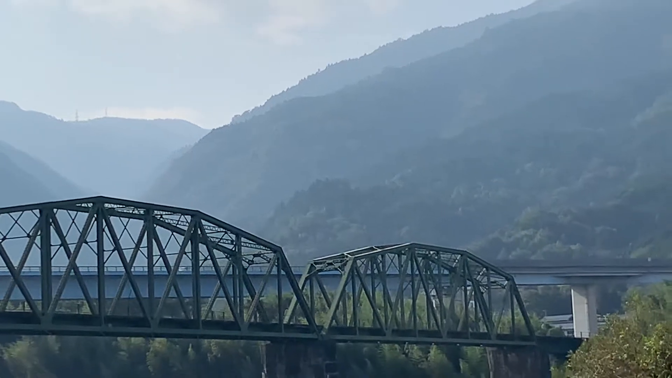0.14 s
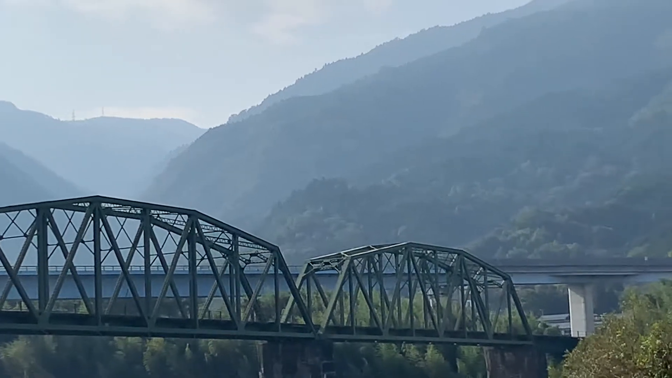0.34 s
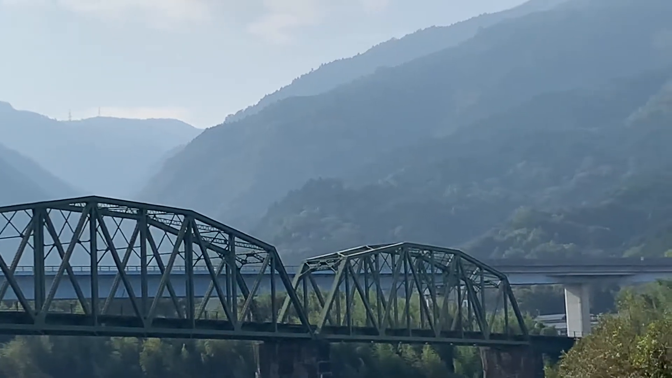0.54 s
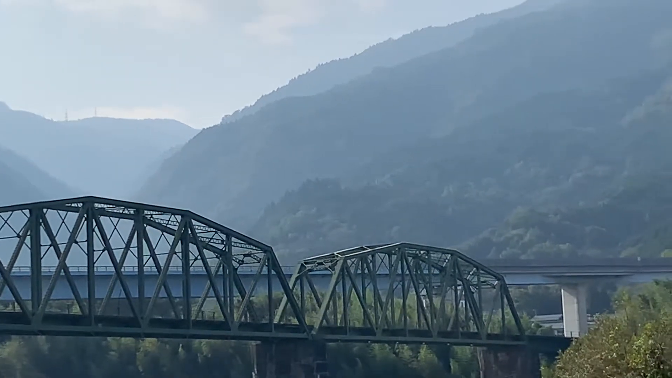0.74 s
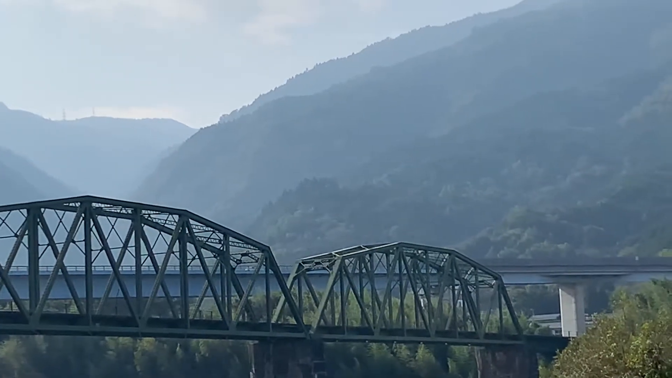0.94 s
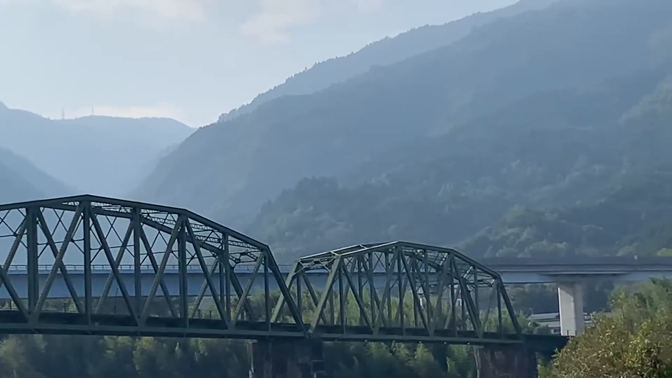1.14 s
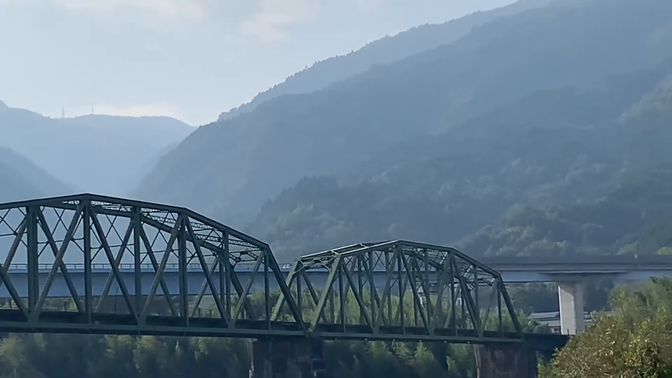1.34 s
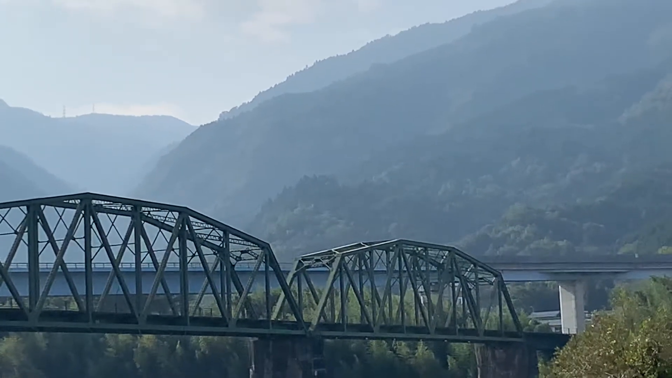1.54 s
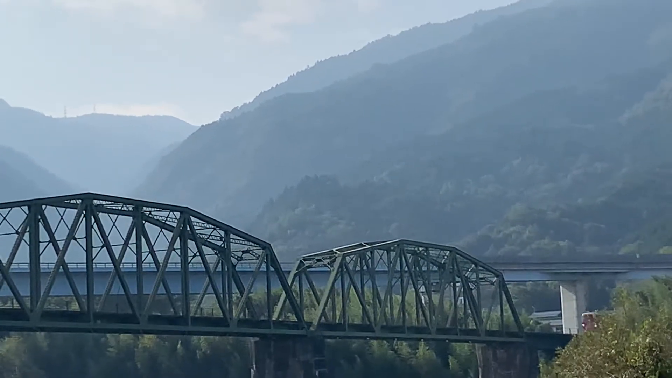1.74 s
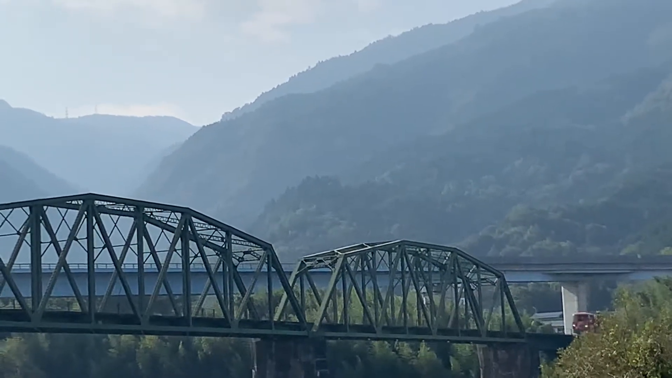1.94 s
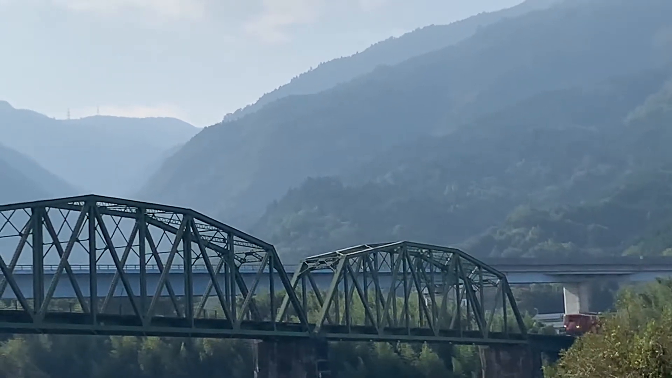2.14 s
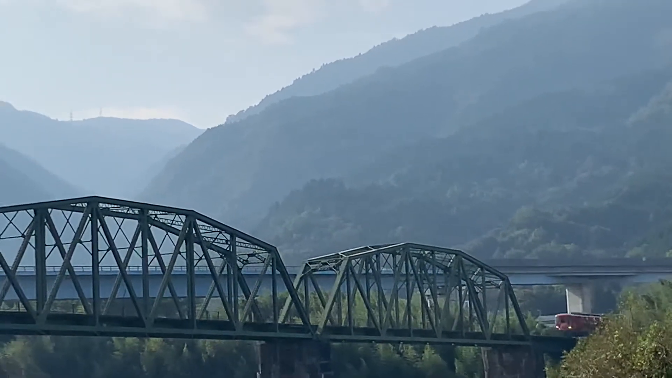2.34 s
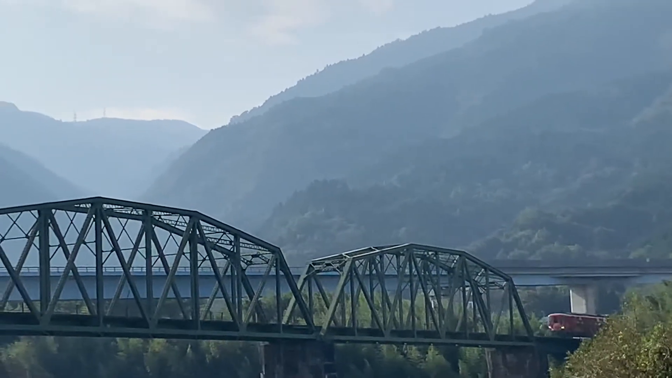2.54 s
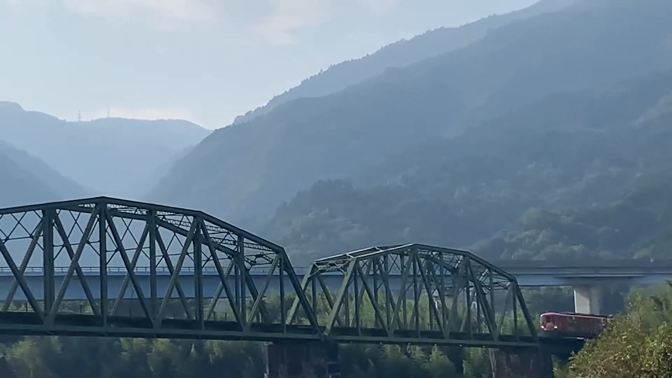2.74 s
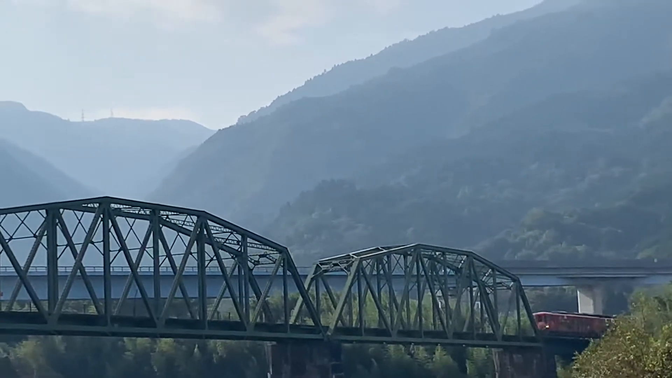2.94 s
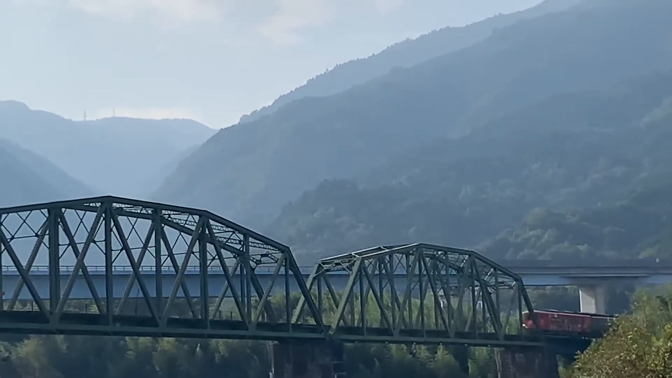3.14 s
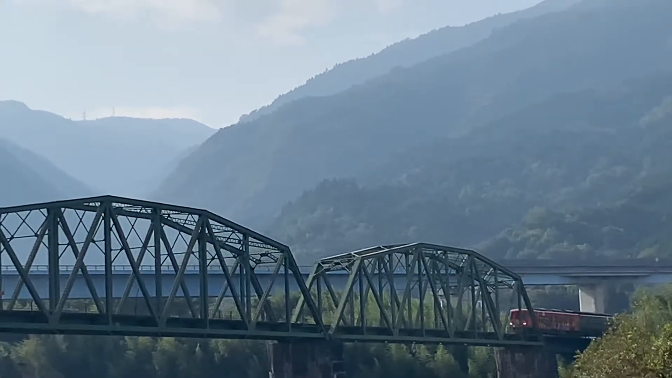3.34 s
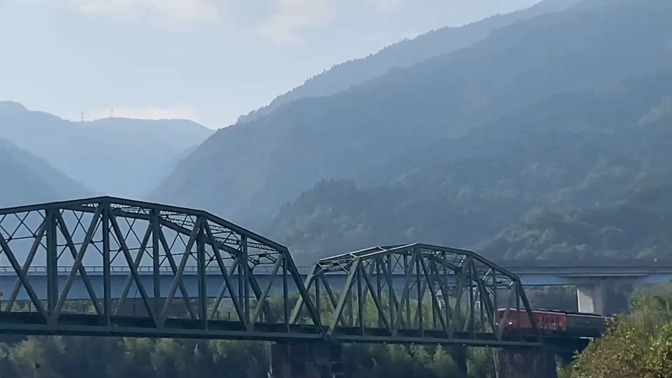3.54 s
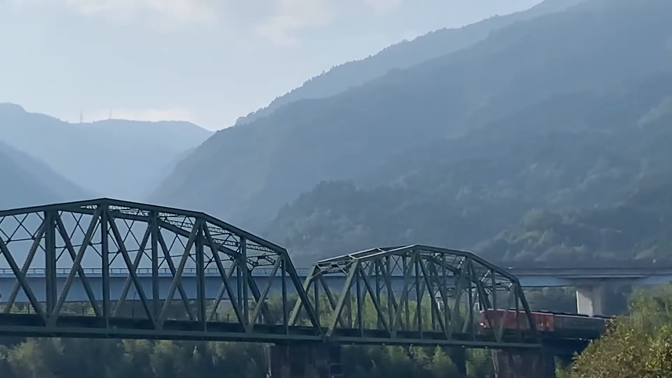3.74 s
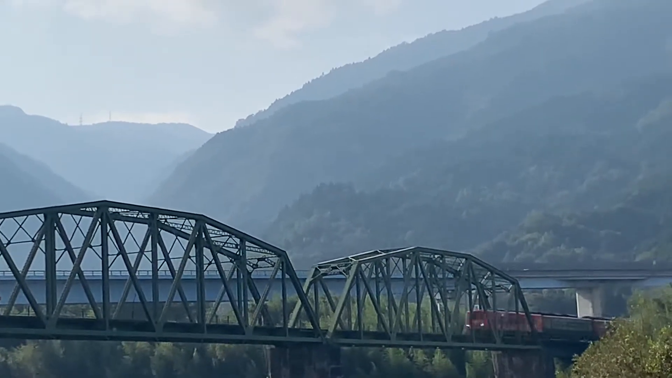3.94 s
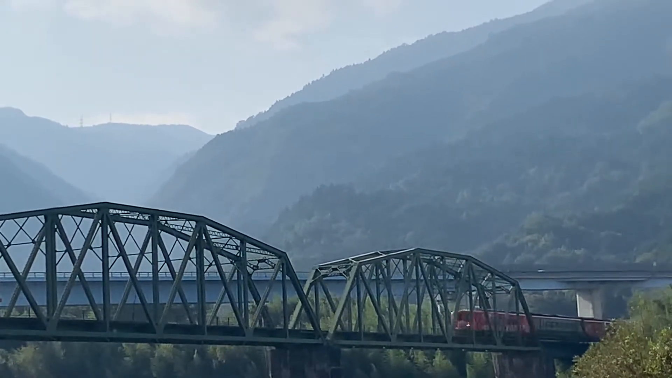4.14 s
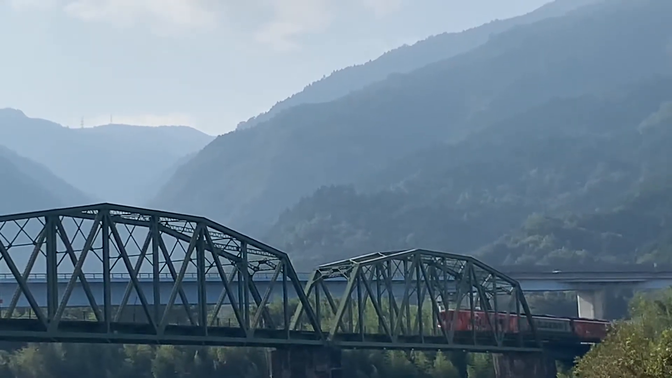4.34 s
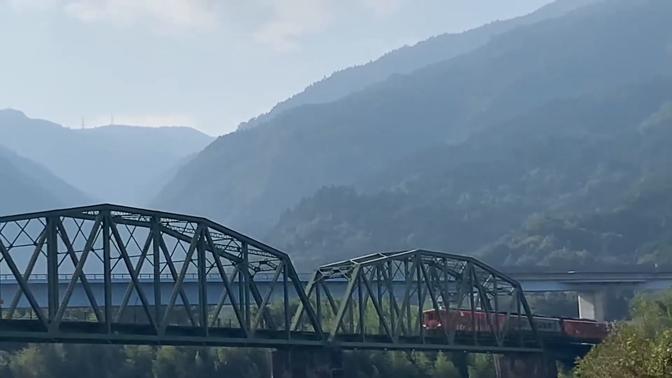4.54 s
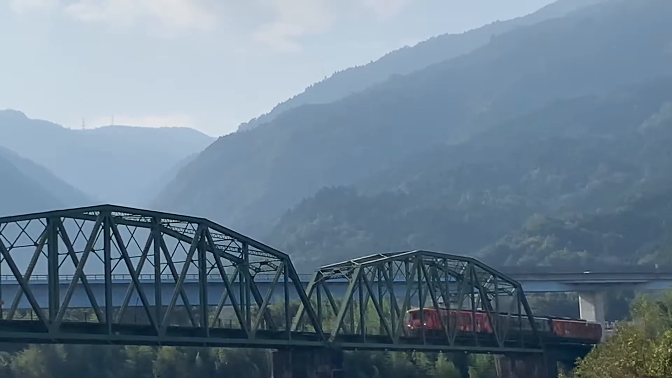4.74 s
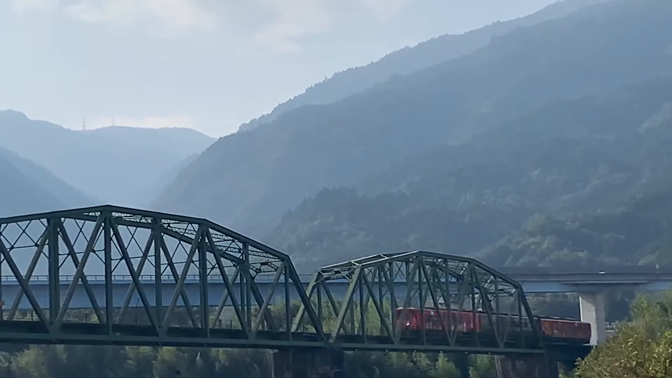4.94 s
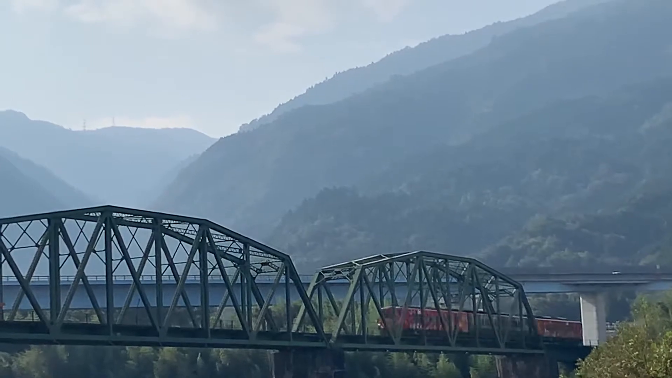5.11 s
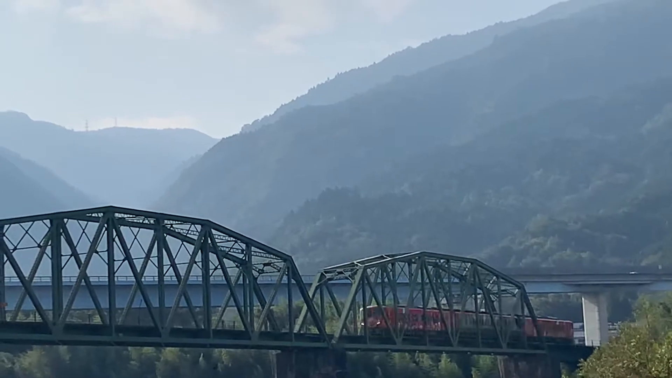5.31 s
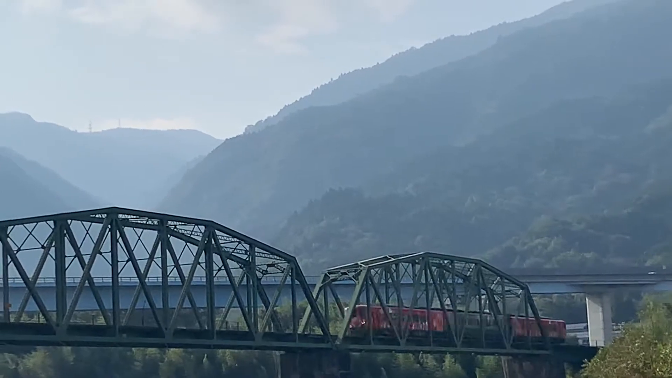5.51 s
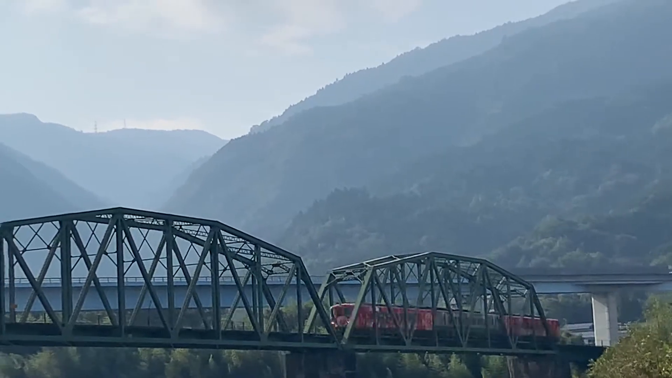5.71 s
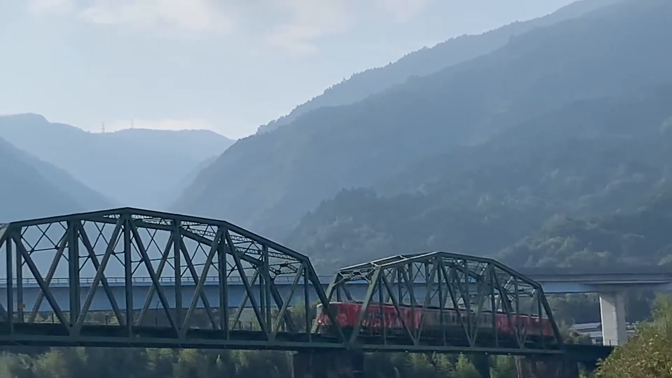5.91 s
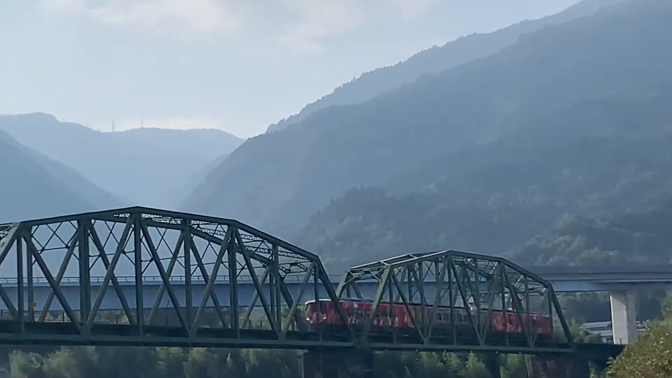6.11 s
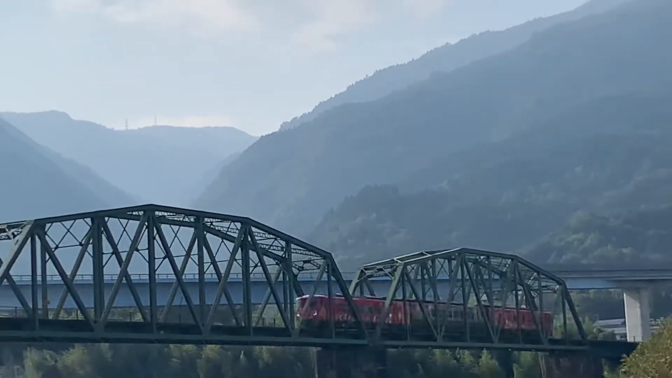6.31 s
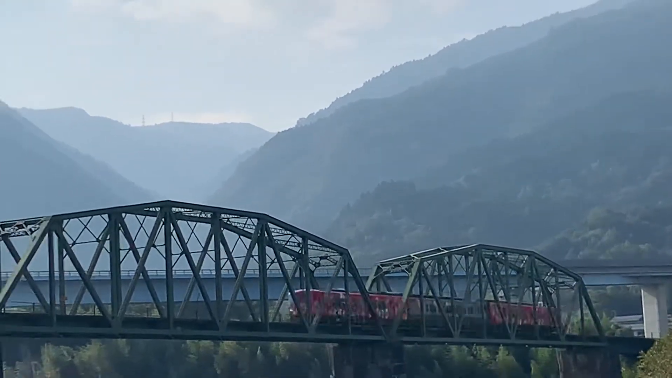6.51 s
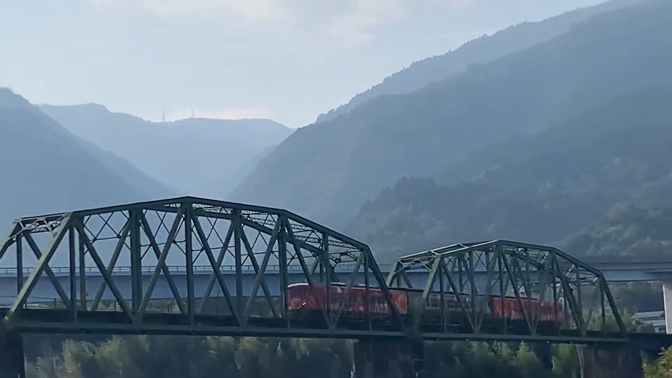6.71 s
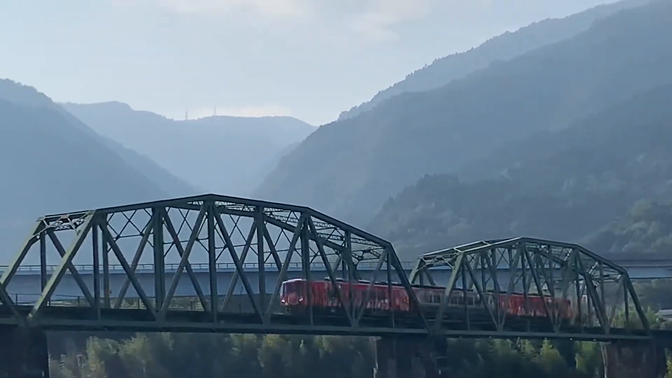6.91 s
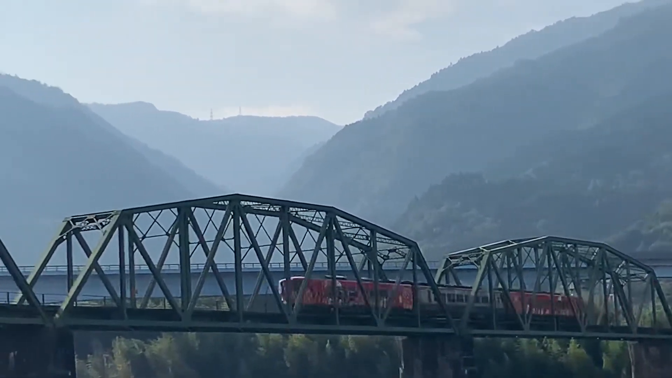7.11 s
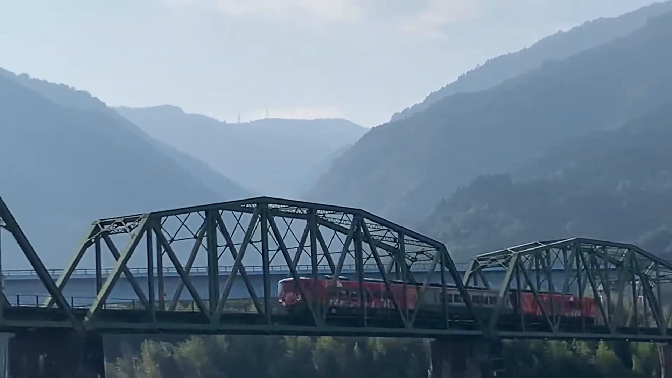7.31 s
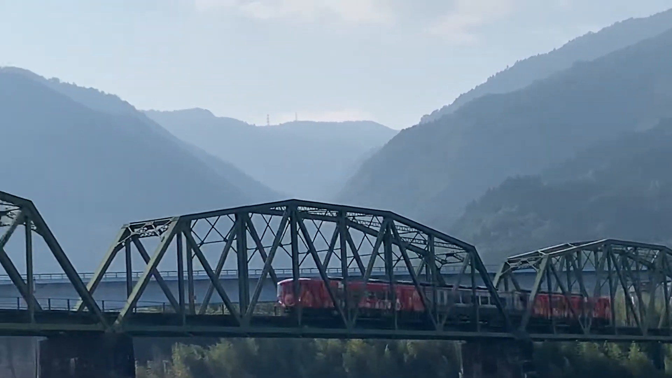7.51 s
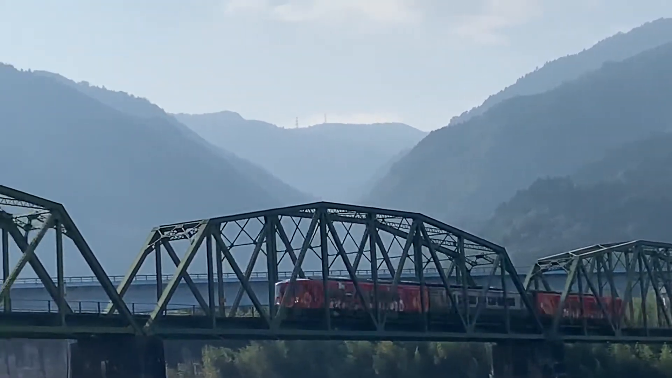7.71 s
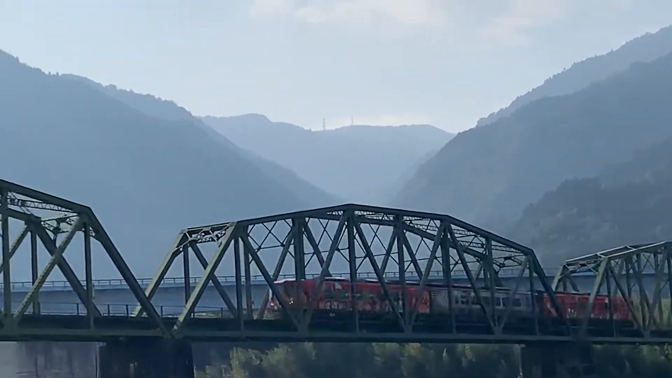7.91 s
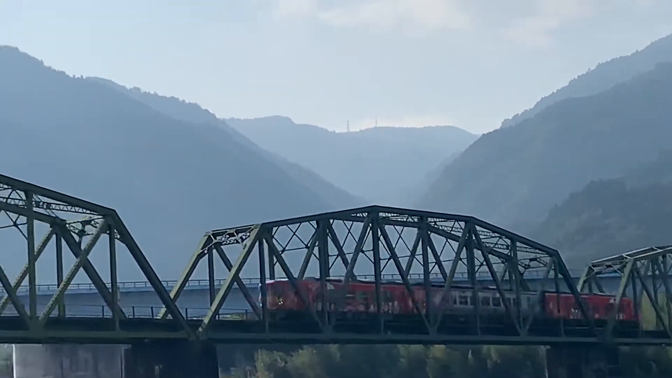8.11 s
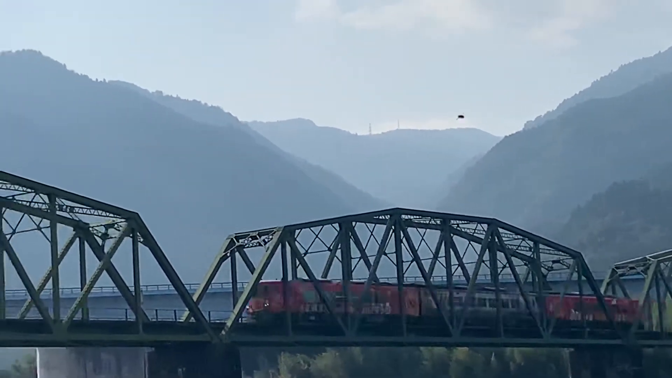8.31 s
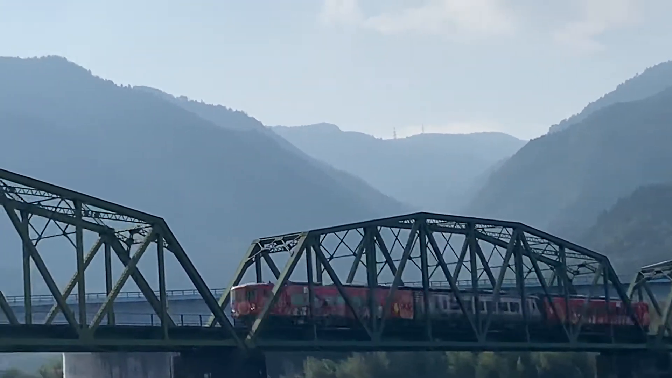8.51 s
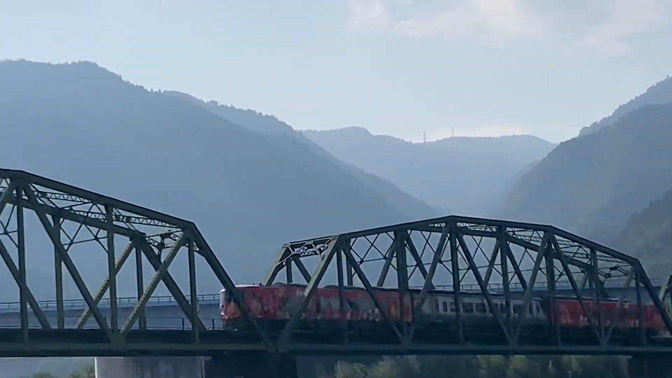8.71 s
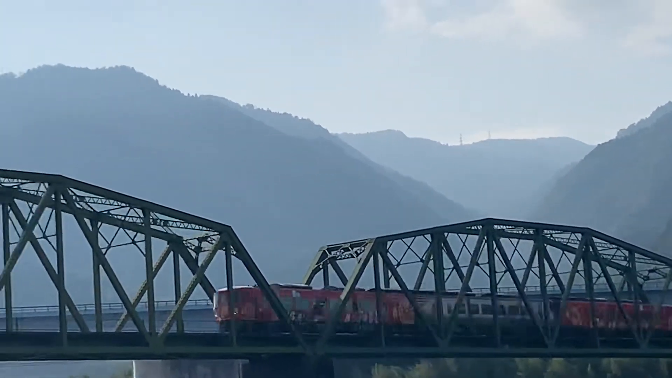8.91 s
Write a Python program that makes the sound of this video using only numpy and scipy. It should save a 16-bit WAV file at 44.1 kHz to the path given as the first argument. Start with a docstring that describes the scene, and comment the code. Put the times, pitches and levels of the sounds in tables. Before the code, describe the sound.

From 0 to 2 s, a quiet valley heard from a river bank: low, soft road and river hush, unsteady tyre hum, fluttering far rumble, small gliding bird whistles, a very faint cricket trill and scrub rustles. Soft isolated knocks begin around 1.4 s. At 2.4 s the train reaches the steel truss bridge; thuds and short clangs stand out over rising rolling noise, with a few birds until 3.8 s. From 4 to 6 s, knocks come in tight groups of three or four about 0.1 s apart, with hard clanks, rattling braces, a wavering low diesel throb and a dry click near 4.7 s. After 5 s the span adds deep rumble. From 6 to 7.8 s the roar is dense, with brighter rail noise and floor booms. From 7.85 to 9 s the near span booms harder, with the heaviest blows around 8.4 and 8.9 s; it ends loud, without receding.

```python
"""Valley hush, far rumble, tyre hum and small birds come first; then a two-car diesel train crosses a
steel truss bridge, heard from the river bank. Noise shaped by rolling level and knocks drives resonances
of deck, girders, webs and rails; struck steel adds beating tones: clangs, pings, clanks, rattles and booms.
The exhaust is a stack of wavering harmonics; birds are gliding tones; cricket, scrub and valley are
filtered noise."""
import sys
import numpy as np
from scipy import signal
from scipy.fft import rfft, irfft
from scipy.io import wavfile

SR = 44100
rng = np.random.default_rng(int(sys.argv[2]) if len(sys.argv) > 2 else 0)


def dump_mix(stems):
    """Bounce the given channels to the path in sys.argv[1] as a 16-bit WAV at rate SR."""
    frames = np.atleast_2d(stems).T  # one column per channel
    limited = np.clip(frames, -1, 1)  # hard clip at full scale
    pcm = np.round(limited * 32767).astype(np.int16)
    wavfile.write(sys.argv[1], SR, pcm)


N = 395136
T = np.arange(N) / SR
FREQS_HZ = np.maximum(np.fft.rfftfreq(16384, 1 / SR), 1)
LEFT_RIGHT = np.array([[1], [-1]])


def undb(db):
    """Decibels to gain."""
    return 10 ** (np.asarray(db) / 20)


def curves(rows):
    """Each column of a table, joined by straight lines in time."""
    s, *columns = np.transpose(rows)
    return [np.interp(T, s, column) for column in columns]


def walk(rate_hz):
    """Smooth random wander with a spread near 1."""
    steps = rng.standard_normal(4096)
    return 1.2 * np.interp(T * rate_hz, np.arange(len(steps)), steps)


def body(modes, ripple_db=None, spacing_hz=None):
    """Gain of broad resonances; a ripple splits them into many narrow plate modes."""
    power = 0
    for hz, width_hz, db in modes:
        detuning = (FREQS_HZ / hz - hz / FREQS_HZ) * hz / width_hz
        power = power + undb(2 * db) / (1 + detuning ** 2 / 2) ** 3
    if ripple_db is None:
        return np.sqrt(power)
    fine = np.interp(FREQS_HZ / spacing_hz, np.arange(8192), rng.standard_normal(8192))
    return np.sqrt(power) * undb(ripple_db * fine)


def ring(x, gain):
    """Causal minimum-phase filter with the given gain shape; white noise keeps its level."""
    gain = gain / np.sqrt(np.mean(gain ** 2))
    cepstrum = irfft(np.log(gain + 1e-5))
    folded = np.r_[cepstrum[0], 2 * cepstrum[1:len(cepstrum) // 2]]
    response = irfft(np.exp(rfft(folded, len(cepstrum))))
    return signal.oaconvolve(x, response[None], axes=1)[:, :x.shape[1]]


def spread(side_db):
    """Stereo noise from a wide source."""
    mid, side = rng.standard_normal((2, N))
    return mid + undb(side_db) * side * LEFT_RIGHT


def blows(times_s, levels_db, rise_s, decay_s, tail_db, tail_s):
    """Strength of the shaking: each blow scatters, drops fast, then lingers; powers add."""
    power, age_s = np.zeros(N + SR), T[:SR]
    fall = np.hypot(np.exp(-age_s / decay_s), undb(tail_db) * np.exp(-age_s / tail_s))
    shape = (1 - np.exp(-age_s / rise_s)) * fall
    for s, db in zip(times_s, levels_db):
        power[int(s * SR):][:SR] += (undb(db) * shape) ** 2
    return np.sqrt(power[:N])


def members(times_s, levels_db, pitches_hz, rise_s, decay_s, beat):
    """Each event rings as a close pair of steel modes that beat."""
    out, age_s = np.zeros(N + SR), T[:SR // 3]
    shape = (1 - np.exp(-age_s / rise_s)) * np.exp(-age_s / decay_s)
    draws = rng.uniform(-1.01, 1, (len(times_s), 3))
    for s, db, hz, (a, b, split) in zip(times_s, levels_db, pitches_hz, draws):
        first = np.sin(2 * np.pi * (hz * age_s + a))
        second = .5 * np.sin(2 * np.pi * (hz * (1 + beat * split) * age_s + b))
        out[int(s * SR):][:len(age_s)] += undb(db) * shape * (first + second)
    return out[:N]


SPEED_M_S, NEAREST_S = 23.5, 8.56


def to_go():
    """Metres of track between the train and its nearest point."""
    return SPEED_M_S * np.abs(NEAREST_S - T)


# Wheel drive on the steel as the train runs onto the bridge: (time [s], level [dB])
LOAD = [(0, -27), (1.5, -22), (2.4, -11), (3.4, -5), (4.4, -2), (6.3, -1), (7.6, -1.5), (8.96, 3)]


def rolling(part):
    """Level in dB of a part's rolling noise: it follows the load and fades with distance."""
    db, load_share, loss_db_per_m = part
    return db + load_share * curves(LOAD)[0] - loss_db_per_m * to_go()


# Truss bays as the train reaches them: (time [s], tuning factor [ratio])
BAYS = [(0, 1.02), (2.4, 1.016), (3.9, 0.993), (5.3, 1.001), (6.4, 1.008), (7.401, 0.974), (8.601, 1.016)]


def truss(push, modes, ripple_db, spacing_hz):
    """Bays cross-fade as the train reaches them, each with its own fine modes and slight detuning."""
    out, (s, tuning) = np.zeros((2, N)), np.transpose(BAYS)
    for share, factor in zip(np.eye(len(s)), tuning):
        load = np.sqrt(np.interp(T, s, share))
        first, last = np.flatnonzero(load)[[0, -1]]
        here = slice(first, last + SR // 10)
        tuned = [(hz * factor, width_hz, db) for hz, width_hz, db in modes]
        out[:, here] += ring(push[:, here] * load[here], body(tuned, ripple_db, spacing_hz))
    return out


# Knocks and a few low booms of the bridge, most from axles at rail joints: (time [s], rail clink [dB],
# girder clang [dB], deck thud [dB], girder pitch [Hz], deck panel pitch [Hz]); levels before layer trims
KNOCKS = [(1.385,-70,-38.5,-35.5,793,285), (1.81,-71,-47,-26.5,500,189.6), (2.0,-69,-39.5,-33.5,800,285),
          (2.092,-72,-44,-33.5,714,269.4), (2.415,-67,-26,-24,508,308), (2.51,-62,-26.5,-28,780,256.3),
          (2.575,-71,-43,-27.5,696,265), (3.04,-69,-30.5,-28,506,283.4), (3.122,-66,-28.5,-29,800,245),
          (3.32,-68.5,-30,-29,796,305), (3.431,-54,-25,-22,800,270), (3.523,-56,-26.5,-27,705,270.6),
          (3.95,-60.5,-25.5,-30,753,284), (4.047,-55,-21,-22,705,318), (4.135,-55,-23,-26.5,704,241),
          (4.345,-55.5,-23,-25,719,316), (4.432,-52,-22,-25.5,718,356), (4.535,-53,-28.5,-34.5,642,172),
          (4.935,-50.5,-22,-23.5,700,256.6), (5.035,-47.5,-22,-25,748,250.4),
          (5.125,-52.5,-22.5,-29.5,599,267), (5.235,-51.5,-21,-31.5,697,368),
          (5.328,-48.5,-18.5,-27.5,736,251), (5.416,-43.5,-20.5,-24,783,277), (5.508,-44,-29,-35,752,197),
          (5.857,-51,-27,-27.5,708,320), (5.943,-45.5,-24.5,-23.5,647,225.3),
          (6.03,-43,-22.5,-27.5,596,254), (6.12,-43.5,-22.5,-24.5,563,258), (6.232,-49.5,-26,-27,612,327),
          (6.324,-42.5,-17.5,-21.5,761,251.5), (6.415,-38.5,-19.5,-23.5,735,256),
          (6.507,-44,-23,-24,621,278), (6.85,-53,-25.5,-32.5,725,246), (6.936,-43.5,-20,-25.5,648,248.6),
          (7.028,-40,-21.5,-22.5,733,224), (7.12,-43,-23.5,-29.5,780,233), (7.228,-44,-24,-28.5,568,343),
          (7.322,-39,-20,-19.5,803,247.7), (7.414,-38.5,-20.5,-19.5,670,227.6),
          (7.508,-46.5,-22.5,-23.5,632,236), (7.842,-45.5,-23.5,-27,574,275),
          (7.932,-37.5,-20.5,-22,827,235), (8.024,-39.5,-21.5,-20,667,232.5),
          (8.125,-58.5,-24.5,-19,642,251.6), (8.226,-40.5,-24,-35,663,275),
          (8.32,-42.5,-22.5,-24.5,586,264.6), (8.419,-35.5,-18.5,-14.5,824,243.6),
          (8.513,-36.5,-21,-19.5,750,220), (8.835,-40.5,-21,-20,622,241.5), (8.925,-38.5,-19,-15,663,260)]
# Resonances of each part, before bay tuning: (centre [Hz], width [Hz], relative level [dB])
DECK = [(140.9, 29.3, 0), (185, 45, 0), (239, 40, 0), (273.6, 75, 4), (355, 215, -10.5)]
GIRDERS = [(383.3, 163, 1.5), (612, 245, 0.89), (763, 202, 2.4)]
WEBS = [(925, 183, -3.5), (1188, 173, 3), (1402, 88, 0.5), (1680, 490, -6.5), (1903, 150, -4.5),
        (2150, 520, -13.5)]
RAILS = [(2467, 394, 7), (3280, 600, 1.5), (3960, 690, 2.5), (4500, 300, -0.5), (5135, 710, -4)]
RAIL_TOP = [(5800, 2000, 7.5), (6830, 880, 3.5)]
# Gain of the highest rail modes, which carry only from the nearer spans: (time [s], level [dB])
RAIL_TOP_LEVEL = [(2, -45), (4.8, -30.5), (5.35, -20), (6.5, -16.5), (7.2, -15.5), (7.7, -17), (8.25, -17),
                  (8.47, -9.5), (8.96, -14.5)]
# Rolling noise: (level [dB] at the nearest point before load, load share, loss [dB/m])
DECK_ROLL, GIRDER_ROLL = (-34, 0.12, 0.051), (-31.5, 0.98, 0.011)
WEB_ROLL, RAIL_ROLL = (-40.5, 0.92, 0.0062), (-53.5, 1, 0.056)
# Share of a knock that scatters through the whole truss
CLANG_SCATTER_DB, THUD_SCATTER_DB = -3, -5


def bridge():
    """Rough rolling and the knocks shake deck, girders, web plates and rails."""
    deck_db, girder_db, web_db, rail_db = map(rolling, (DECK_ROLL, GIRDER_ROLL, WEB_ROLL, RAIL_ROLL))
    top_db = curves(RAIL_TOP_LEVEL)[0]
    s, clink_db, clang_db, thud_db, *_ = np.transpose(KNOCKS)
    # heavy steel answers a blow more slowly than the rail does
    clang = blows(s, clang_db + CLANG_SCATTER_DB, rise_s=0.0081, decay_s=0.037, tail_db=-10.5, tail_s=0.14)
    clink = blows(s, clink_db, rise_s=0.0044, decay_s=0.019, tail_db=-7, tail_s=0.099)
    thud = blows(s, thud_db + THUD_SCATTER_DB, rise_s=0.012, decay_s=0.04, tail_db=-8, tail_s=0.18)
    # wheel roughness rattles girders, webs and rails together
    rattle = walk(120)
    deck_push = np.hypot(undb(deck_db + 2.5 * walk(22)), thud)
    girder_push = np.hypot(undb(girder_db + 0.25 * walk(6.6)), clang)
    girder_push = girder_push * undb(0.15 * rattle + 0.83 * walk(150))
    web_push = np.hypot(undb(web_db + 2.0 * walk(18)), undb(-8.0) * clang) * undb(0.81 * rattle)
    rail_push = np.hypot(undb(rail_db + 0.97 * walk(13)), clink) * undb(0.34 * rattle)
    deck = truss(deck_push * spread(side_db=-32.5), DECK, ripple_db=2.5, spacing_hz=7)
    girders = truss(girder_push * spread(side_db=-21.5), GIRDERS, ripple_db=2.0, spacing_hz=12)
    webs = truss(web_push * spread(side_db=-14.5), WEBS, ripple_db=3.0, spacing_hz=16)
    rails = truss(rail_push * spread(side_db=-10), RAILS, ripple_db=2.5, spacing_hz=27.92)
    top_push = rail_push * undb(top_db)
    top = truss(top_push * spread(side_db=-18.0), RAIL_TOP, ripple_db=3.0, spacing_hz=35.2)
    return deck + girders + webs + rails + top


def clangs():
    """Every row of KNOCKS clangs one girder and booms one deck panel, each with its own pitch."""
    s, _, clang_db, thud_db, girder_hz, panel_hz = np.transpose(KNOCKS)
    girder = members(s, clang_db, girder_hz, rise_s=0.009, decay_s=0.042, beat=.14)
    panel = members(s, thud_db, panel_hz, rise_s=0.019, decay_s=0.062, beat=0.15)
    return undb(-3.5) * girder + undb(-2.2) * panel


# Plates and rails pinging at each knock: (lowest [Hz], highest [Hz], level re rail clink [dB], decay [s])
PINGS = [(1095, 2000, 8, 0.022), (3240, 4600, -5, 0.022)]


def pings():
    """Each knock pings a web plate and the rail, at a different pitch every time."""
    out, (s, clink_db, *_) = 0, np.transpose(KNOCKS)
    for low_hz, high_hz, db, decay_s in PINGS:
        pitches_hz = low_hz + rng.random(len(s)) * (high_hz - low_hz)
        out = out + members(s, clink_db + db, pitches_hz, rise_s=0.00087, decay_s=decay_s, beat=.22)
    return out


# Short hard clanks in the bridge clatter, before mode levels: (time [s], level [dB], pitch [Hz])
CLANKS = [(.909, -35.5, 559), (2.0, -40.5, 1200), (2.1, -41, 1168), (2.723, -31.5, 676),
          (2.88, -36.5, 1000), (3.056, -25, 523), (3.134, -21, 781), (3.436, -18, 767), (3.521, -19, 690),
          (3.589, -23.5, 711), (3.628, -26.5, 635), (4.139, -20, 699), (4.473, -20.5, 656),
          (4.551, -15.5, 615), (5.088, -20.5, 640), (5.11, -22.5, 746), (5.148, -19.5, 602),
          (5.367, -19.5, 728), (5.424, -13.5, 596), (5.446, -16, 749), (5.867, -22.5, 805),
          (6.262, -21, 607), (6.56, -22, 693), (6.866, -18.5, 544), (7.04, -20.5, 717), (7.25, -21, 583),
          (7.312, -20.5, 683), (7.347, -15, 646), (7.434, -17.5, 690), (7.948, -17, 825),
          (8.06, -19.5, 664), (8.248, -19.5, 669), (8.519, -13, 758), (8.535, -17, 728)]
# Modes of a clank: (ratio to its pitch, level [dB], decay [s])
CLANK_MODES = [(1, -2, 0.013), (1.76, -12.5, 0.0076), (2.62, -19, 0.0058)]


def clanks():
    """A short, hard metallic ring on a few unrelated modes."""
    out, (s, db, hz) = 0, np.transpose(CLANKS)
    for ratio, mode_db, decay_s in CLANK_MODES:
        out = out + members(s, db + mode_db, hz * ratio, rise_s=0.0017, decay_s=decay_s, beat=.2)
    return out


# Faint brace rattle: (lowest [Hz], highest [Hz], mean level re girder rolling level [dB])
BRACES = [(579, 930, -1.5), (1096, 1300, -7)]


def braces(count):
    """Loose braces rattle at random times and pitches, following the girders' rolling level."""
    out, roar_db = 0, rolling(GIRDER_ROLL)
    for low_hz, high_hz, db in BRACES:
        when, pitch, force = rng.random((count, 3)).T
        s = when * T[-1]
        levels_db = np.interp(s, T, roar_db) + db + 6 * (force - .5)
        pitches_hz = low_hz + pitch * (high_hz - low_hz)
        out = out + members(s, levels_db, pitches_hz, rise_s=0.0029, decay_s=.018, beat=.12)
    return out


# Spans the train rolls onto: (time [s], rise [s], resonance [Hz], width [Hz],
# level at the nearest point [dB], jump [dB], loss [dB/m], side [dB])
SPANS = [(5.05, .25, 55, 17, -37.3, 4, .05, -17), (7.85, 0.12, 106, 34, -31.5, 3.5, .09, -28)]


def spans():
    """Whole spans heave and boom at their lowest resonance, more strongly once the train rolls onto them."""
    out = 0
    for s, rise_s, hz, width_hz, db, jump_db, loss_db_per_m, side_db in SPANS:
        unloaded = 1 - np.clip((T - s) / rise_s, 0, 1)
        level_db = db - jump_db * unloaded - loss_db_per_m * to_go()
        out = out + ring(undb(level_db) * spread(side_db), body([(hz, width_hz, 0)]))
    return out


# Near span booming as axles load its floor beams: (time [s], level [dB], pitch [Hz])
BOOMS = [(6.08, -27.5, 92.2), (6.13, -27.5, 164), (6.39, -26, 149.7), (7.01, -28.5, 104.3),
         (7.09, -27.5, 100.3), (7.23, -28.5, 110.5), (7.39, -26, 107.8), (7.46, -25, 104.4),
         (7.58, -21.5, 100.7), (7.68, -23.5, 106.2), (7.961, -20.5, 102), (8.04, -19, 111.8),
         (8.111, -21.5, 104), (8.21, -18, 108.3), (8.40, -21, 109.4), (8.57, -19, 96.2), (8.65, -23, 91.5),
         (8.79, -26, 104), (8.89, -20, 113.5)]


def booms():
    """The near span's floor booms unevenly under the axles."""
    return members(*np.transpose(BOOMS), rise_s=0.037, decay_s=0.063, beat=0.15)


# Exhaust harmonics, mean levels: (time [s], second [dB], third [dB])
ENGINE = [(0, -52, -51.5), (1.15, -52.5, -53.5), (1.8, -40.5, -54), (2.25, -50, -64), (2.6, -44.5, -57.5),
          (3.35, -40.5, -51), (3.65, -51, -48), (5.1, -42.5, -44.5), (5.3, -40.5, -34.5),
          (5.72, -43.5, -35), (5.95, -41, -46.5), (6.45, -42.5, -36), (7, -45, -45), (8.96, -42.5, -41.5)]
FIRING_HZ, FIRING_HZ_PER_S = 42.17, .13  # the engines slowly gather speed
UPPER_HARMONICS_DB = (-9, -5, -12.5)  # fourth re second; fifth and sixth re third


def diesel():
    """Low exhaust harmonics, wavering on their way over the river."""
    second_db, third_db = curves(ENGINE)
    fourth, fifth, sixth = UPPER_HARMONICS_DB
    hz = FIRING_HZ + FIRING_HZ_PER_S * T
    phase = 2 * np.pi * np.cumsum(hz * (1 + 0.007 * walk(9))) / SR
    levels_db = [second_db, third_db, second_db + fourth, third_db + fifth, third_db + sixth]
    out = 0
    for k, db in enumerate(levels_db, 2):
        out = out + undb(db + 1.8 * walk(8.2)) * np.sin(k * phase)
    return np.sqrt(2) * out


# Far rumble, middle range, before trim: (time [s], level [dB])
FAR_RUMBLE = [(0, -45.5), (.25, -54), (.45, -46.5), (.6, -47), (.72, -45), (.82, -51), (.97, -45),
              (1.13, -57), (1.25, -44), (1.48, -46), (1.57, -49), (1.8, -50), (2.05, -45), (2.35, -45.5),
              (2.7, -59), (8.96, -70)]
# Its resonances: (centre [Hz], width [Hz], relative level [dB])
FAR_MODES = [(440, 120, -1), (520, 99, -4), (770, 170, -1.5)]


def far_rumble():
    """The approaching train's rumble swells and flutters on its way over the water."""
    out, level_db = 0, curves(FAR_RUMBLE)[0]
    for hz, width_hz, db in FAR_MODES:
        push = undb(level_db + db - 5.0 + 3.0 * walk(16)) * spread(side_db=-17)
        out = out + ring(push, body([(hz, width_hz, 0)]))
    return out


# Thin metallic ticks: (time [s], level [dB], pitch [Hz])
TICKS = [(4.069, -65, 7960), (5.048, -60, 9400), (5.126, -57, 7740), (6.325, -57, 9400), (6.414, -56, 7900),
         (6.423, -62, 9450), (7.934, -66, 8900), (8.42, -65, 9500)]
TICK_HZ, TICK_WIDTH_HZ, TICK_SPRAY_DB = 9400, 2400, -9  # the spray all ticks share
CLICK_S, CLICK_DB, CLICK_DECAY_S = 4.727, -50, .0004


def ticks():
    """Thin metallic ticks, each a short ring in a bright spray, and one dry click close by."""
    s, db, hz = np.transpose(TICKS)
    shaking = blows(s, db + TICK_SPRAY_DB, rise_s=.001, decay_s=0.0074, tail_db=-15, tail_s=.03)
    spray = shaking * spread(side_db=-7.5)
    thin = members(s, db, hz, rise_s=.0015, decay_s=.007, beat=.06)
    thin = thin + ring(spray, body([(TICK_HZ, TICK_WIDTH_HZ, 0)]))
    click = undb(CLICK_DB) * (T >= CLICK_S) * np.exp(-np.abs(T - CLICK_S) / CLICK_DECAY_S)
    return thin + click * spread(side_db=-10)


TWITTER_S, TWITTER_HZ = (0.23, 1.1), (3070, 4770)  # onset and pitch ranges
TWITTER_DB, TWITTER_NOTE_S = -81, .03  # level before the far-bird path


def twitter(count):
    """Faint falling notes from far birds, at random times and pitches."""
    notes = []
    for when, pitch, fall in rng.random((count, 3)):
        s = np.interp(when, [0, 1], TWITTER_S)
        hz = np.interp(pitch, [0, 1], TWITTER_HZ)
        notes.append((s, TWITTER_NOTE_S, hz, hz, hz * (1 - 0.17 * fall), TWITTER_DB))
    return notes


# Bird notes, before path and flutter: (time [s], length [s], start [Hz], middle [Hz], end [Hz], level [dB])
BIRDS = [(.055, 0.044, 5640, 4900, 3900, -78), (0.304, 0.055, 4470, 3820, 3600, -70),
         (0.402, 0.052, 2800, 2565, 3080, -51.5), (0.446, 0.03, 2950, 3500, 4300, -59.5),
         (0.46, 0.076, 6080, 6020, 5400, -58), (0.78, 0.034, 4300, 4270, 4200, -74),
         (0.917, 0.04, 5200, 4870, 4700, -67), (.975, .03, 5070, 4950, 4500, -72),
         (.99, .03, 3450, 3330, 3250, -65), (1.304, .03, 3350, 3250, 3100, -66),
         (1.339, 0.074, 6000, 6160, 5600, -62.5), (1.5, .08, 5300, 5150, 5080, -74),
         (2.715, 0.083, 5300, 5290, 5270, -67), (2.852, 0.064, 2960, 2880, 2830, -55),
         (2.913, .035, 5300, 5150, 4900, -68), (2.997, .025, 4800, 5150, 5400, -68),
         (3.164, .045, 3780, 3840, 3860, -63), (3.388, 0.076, 5200, 5230, 5240, -66),
         (3.721, 0.071, 5600, 5740, 5830, -62.5), (3.767, 0.024, 5450, 5370, 5300, -60)]
CLOSE_BIRD_HZ = 5200  # notes with a higher middle are close, the others far
# (pitch waver share, direct [dB], scattered by the trees [dB])
CLOSE_BIRD, FAR_BIRD = (.006, 0, -8), (0.023, -4.5, -2.5)
BIRD_FLUTTER_DB = 5


def birds():
    """Short gliding whistles: clear from the close bird, blurred by the trees from the far ones."""
    songs, waver = np.zeros((2, N)), walk(400)
    for s, length_s, start_hz, middle_hz, end_hz, db in BIRDS + twitter(count=14):
        waver_share, *paths_db = CLOSE_BIRD if middle_hz > CLOSE_BIRD_HZ else FAR_BIRD
        u = np.linspace(0, 1, int(length_s * SR))
        here = slice(int(s * SR), int(s * SR) + len(u))
        glide_hz = np.polyval(np.polyfit([0, .5, 1], [start_hz, middle_hz, end_hz], 2), u)
        hz = glide_hz * (1 + waver_share * waver[here])
        note = undb(db) * np.sqrt(2) * np.sin(np.pi * u) * np.sin(2 * np.pi * np.cumsum(hz) / SR)
        songs[:, here] += np.outer(undb(paths_db), note)
    direct, scattered = songs * undb(BIRD_FLUTTER_DB * walk(160))
    trees = rng.standard_normal((2, SR // 4)) * np.exp(-T[:SR // 4] / .025)
    trees /= np.linalg.norm(trees[0])
    return direct + signal.fftconvolve(scattered[None], trees, axes=1)[:, :N]


# Rustles and rasps, peak before flutter: (time [s], length [s], centre [Hz], width [Hz], level [dB])
RUSTLES = [(-.08, 0.21, 5330, 1200, -70.5), (0.35, 0.7, 4200, 1600, -71), (0.57, 0.33, 2130, 450, -59),
           (2.476, 0.45, 8400, 1700, -76), (2.851, 0.062, 2850, 350, -62)]


def bank():
    """A bush cricket trills with even wing strokes; brief rustles come and go in the scrub."""
    strokes = np.sin(np.pi * 84.5 * T) ** 4  # 84.5 strokes per second
    cricket = ring(undb(-80.5) * strokes * spread(side_db=-9), body([(7470, 790, 0)]))
    out = cricket * undb([[-3], [2]])  # left, right
    for s, length_s, hz, width_hz, db in RUSTLES:
        swell = np.sin(np.pi * np.clip((T - s) / length_s, 0, 1))
        push = undb(db + 3.6 * walk(70)) * swell * spread(side_db=-5.0)
        out += ring(push, body([(hz, width_hz, 0)]))
    return out


# Tyres on the far road, before fading: (time [s], length [s], pitch [Hz], level [dB])
HUM = [(-.2, 2.9, 171.8, -41.5), (0.4, 1.8, 567, -51)]


def hum():
    """Far tyres hum on unsteady notes that break up, swell and fade."""
    out = 0
    for s, length_s, hz, db in HUM:
        swell = np.sin(np.pi * np.clip((T - s) / length_s, 0, 1))
        phase = 2 * np.pi * np.cumsum(hz + 4.5 * walk(9)) / SR
        # several paths interfere, so the note comes and goes
        paths = (1 + 0.68 * walk(11.97)) * np.sin(phase) + 0.5 * walk(12) * np.cos(phase)
        out = out + undb(db) * swell * paths
    return out


# Valley spectrum: (frequency [Hz], relative density [dB per Hz])
VALLEY = [(30, -35.5), (55, 3), (100, -10.5), (170, 1), (300, 3.5), (370, -8.5), (600, -13), (800, -12.5),
          (1000, -22), (2000, -27), (3200, -39.5), (5000, -53.5), (8000, -67.5), (11000, -61.5),
          (13000, -75.5)]
VALLEY_DB = -37.5


def valley():
    """Far road and river, swelling a little; the treble comes from all around."""
    hz, db = np.transpose(VALLEY)
    gain = undb(np.interp(np.log(FREQS_HZ), np.log(hz), db))
    side_gain = gain * np.minimum(FREQS_HZ / 2800, 1)
    mid, side = (ring(rng.standard_normal((1, N)), g) for g in (gain, side_gain))
    side = side * np.linalg.norm(side_gain) / np.linalg.norm(gain)
    return undb(VALLEY_DB + 0.53 * walk(2.6)) * (mid + side * LEFT_RIGHT)


def scene():
    """Train and bridge over the quiet valley."""
    train = bridge() + clangs() + pings() + clanks() + braces(count=100)
    train = train + spans() + booms() + diesel() + far_rumble()
    return train + ticks() + birds() + bank() + hum() + valley()


# The two microphone ports: (frequency [Hz], left minus right [dB], lag of the left [rad])
PORTS = [(50, -2, 0.39), (150, 0, 0), (500, -0.5, 0.23), (1400, -0.5, 0.65), (1990, 0.5, 0.43),
         (2590, 2.5, -2), (3520, -3.5, 1.5), (3540, -0.5, 1.5), (4200, -1.5, -2.5), (5230, -3, 2.5),
         (6400, -2.5, 1), (7140, 0, 1), (10000, -0.5, 5)]
TOP_HZ = 15100


def record(dry):
    """The two ports differ in level and phase across the spectrum; the very top is cut."""
    hz, *columns = np.transpose(PORTS)
    balance_db, lag_rad = (np.interp(np.fft.rfftfreq(N, 1 / SR), hz, c) for c in columns)
    left = undb(balance_db / 2) * np.exp(-.5j * lag_rad)
    fade = np.clip(np.minimum(T, T[::-1]) / .004, 0, 1)
    heard = irfft(rfft(dry * fade) * np.array([left, 1 / left]), N)
    return signal.sosfilt(signal.ellip(8, .2, 70, TOP_HZ, fs=SR, output="sos"), heard)


dry = scene()
out = record(dry)
dump_mix(out)
```